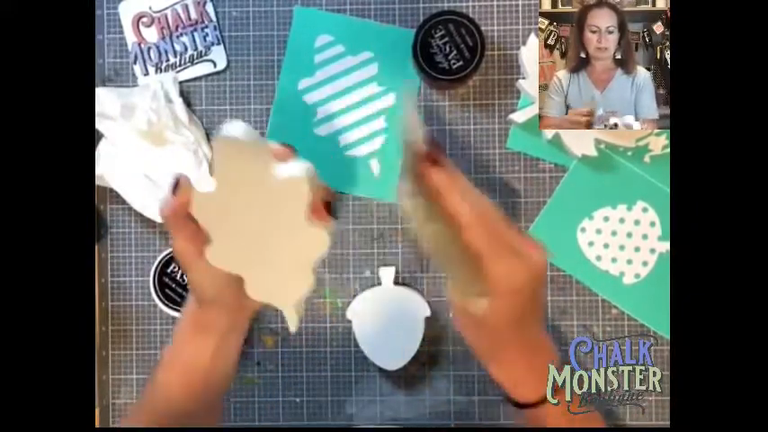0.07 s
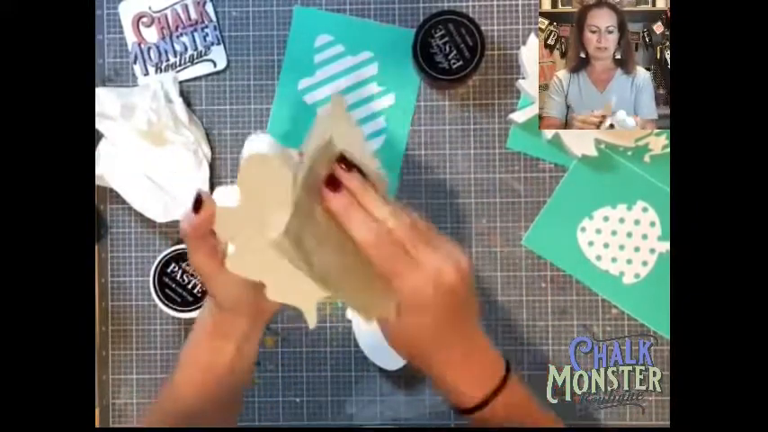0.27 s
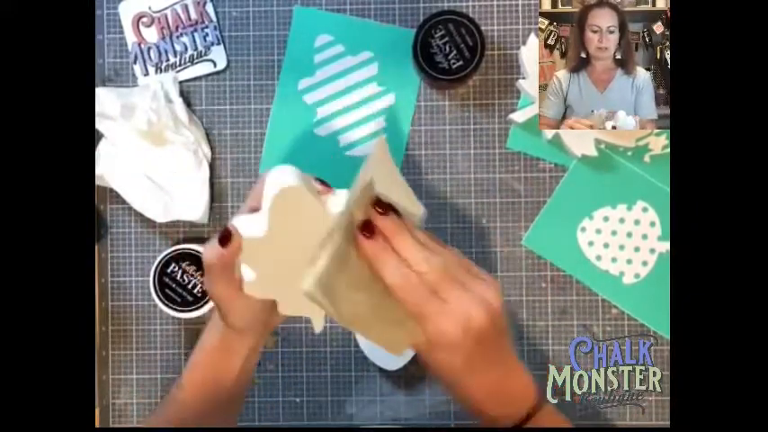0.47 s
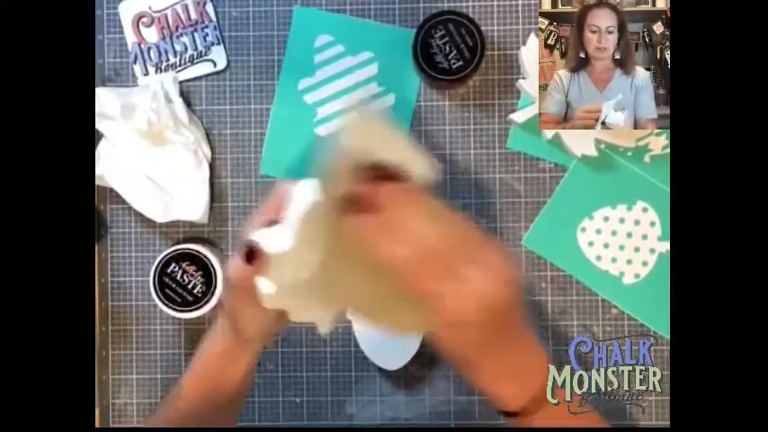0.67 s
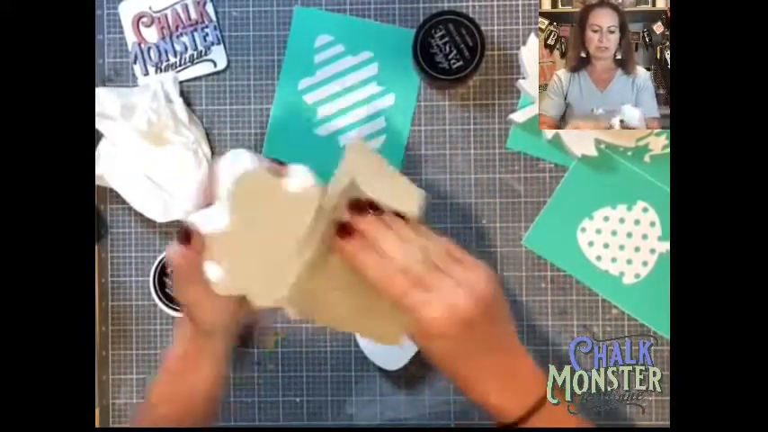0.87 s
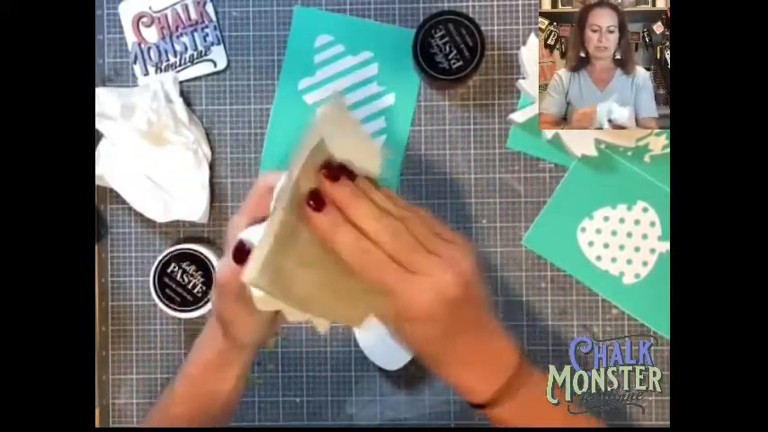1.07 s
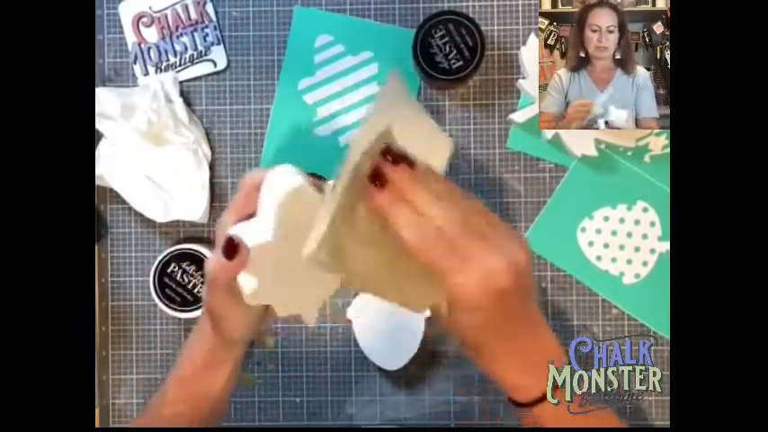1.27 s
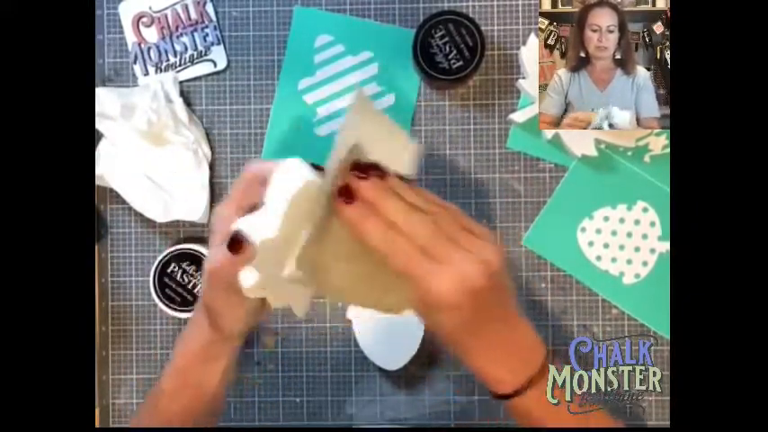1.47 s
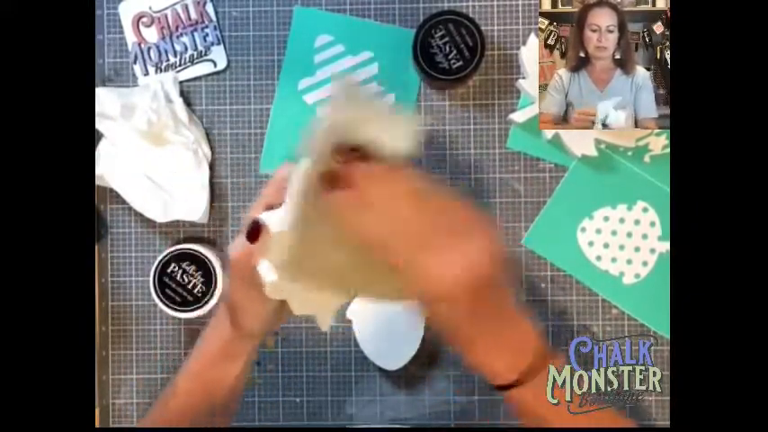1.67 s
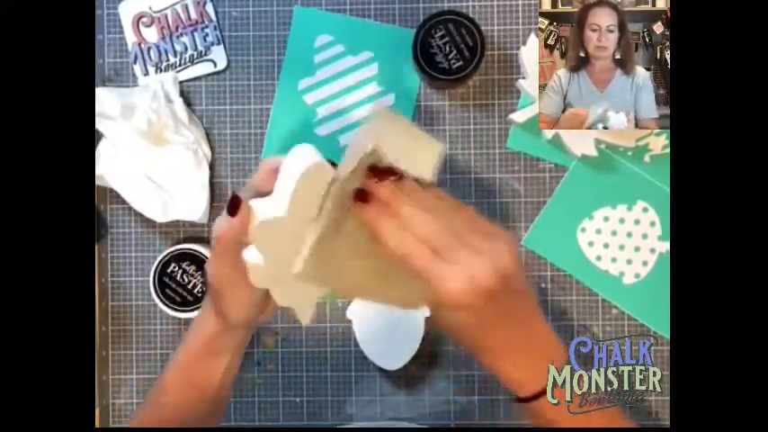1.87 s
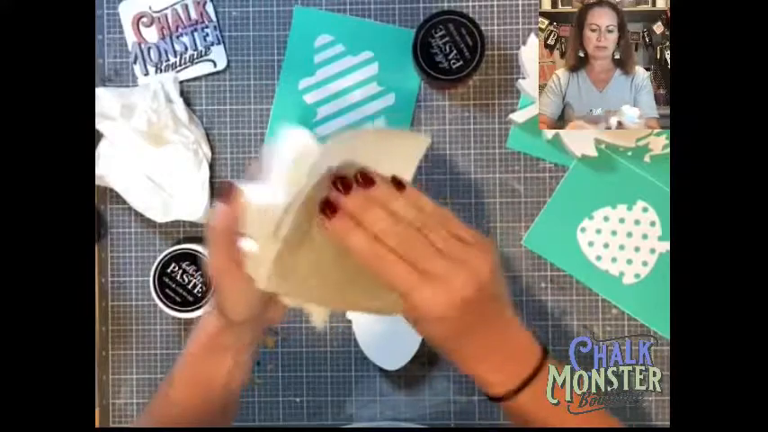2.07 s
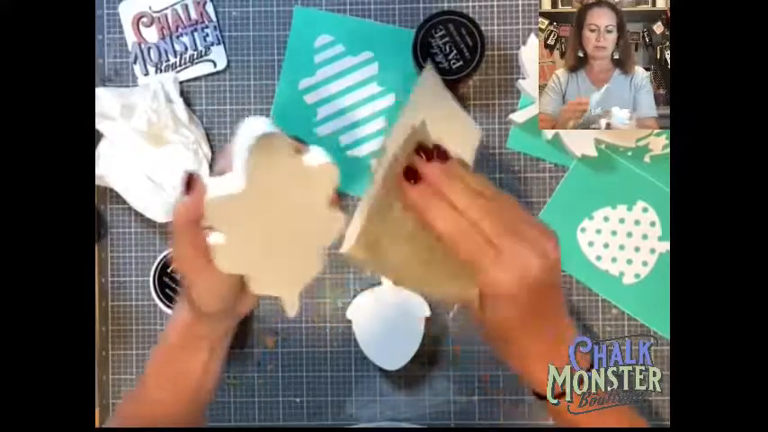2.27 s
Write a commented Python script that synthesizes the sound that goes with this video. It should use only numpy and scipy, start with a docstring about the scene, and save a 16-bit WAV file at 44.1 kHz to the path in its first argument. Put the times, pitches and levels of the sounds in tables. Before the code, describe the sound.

Sandpaper rubs the edge of a small wooden cutout in six quick separate strokes, each a papery tap then a gritty scrape, the third-of-a-second rhythm fairly even, close microphone in a quiet small room.

```python
"""Sandpaper on a wooden edge

Sandpaper is swept in six quick strokes, the first in two passes, along a hand-held wooden cutout in a small room.
Each stroke opens with a papery tap: noise bursts make the slap and the thump. Random grains then scrape the edge
and ring the thin board through resonant filters. Short bursts snag, and narrow noise swells rasp and bend the board.
Echoes of shaped noise make the room; a low hum, faint air and an earlier stroke's fading ring lie under it."""
import sys
import numpy as np
from scipy import signal
from scipy.fft import rfft, irfft
from scipy.io import wavfile

SR = 44100
rng = np.random.default_rng(int(sys.argv[2]) if len(sys.argv) > 2 else 0)


def persist_wave(psi):
    """Save psi, clipped to +-1, as 16-bit WAV."""
    counts = np.round(np.clip(psi, -1, 1) * 32767).astype(np.int16)
    wavfile.write(sys.argv[1], SR, np.atleast_2d(counts).T)


N = 102576  # length in samples

# Scraping passes, one list of points each. Each row: time in seconds, relative level in dB,
# treble in dB (TREBLE_REF_DB is neutral), low mids in dB (LOW_MID_REF_DB is neutral).
PASSES = [
    [(0.39, -66, 1, -11), (0.4, -56.5, -21, 1), (0.415, -57.5, -2.5, -15), (0.435, -52.5, 1.5, 3.5),
     (0.468, -53.5, 1.5, -3), (0.495, -60.5, -6, 7)],
    [(0.522, -62.0, -9.0, -7), (0.54, -43, -18, -10), (0.553, -38.5, -13.5, -8.5), (0.568, -42.0, -16, -4),
     (0.585, -54, -3, 3), (0.605, -62, -21, -3.0)],
    [(0.8, -45.5, -3.5, 7.5), (0.813, -53, 2, -9.0), (0.835, -34, -3, -2.5), (0.848, -37.0, -7, -6),
     (0.866, -28.5, -11, -8.5), (0.885, -32.5, -12, -9), (0.91, -26.5, -7.5, -24), (0.928, -40.5, -4, -4),
     (0.95, -61, -18, -7)],
    [(1.148, -44, -6.5, 2.5), (1.162, -48, -2, -5.5), (1.195, -42, -5.5, -9.0), (1.207, -32.5, -13, -14),
     (1.228, -38.0, -11, -3), (1.243, -50.5, 0, -3), (1.268, -51.5, -2.5, -4), (1.295, -60, -1, 2)],
    [(1.468, -51.0, -3, 8), (1.487, -45.5, 4.5, -13.0), (1.505, -37, -2, -7), (1.521, -32, -4, -11.5),
     (1.535, -46, -21, -17), (1.56, -58, -1, -1), (1.583, -42, -7.5, -12), (1.605, -58, -25, -9.0)],
    [(1.775, -57.5, 3, -7), (1.8, -46.5, 5, -6), (1.818, -47, -6, -5), (1.834, -33.5, -4.5, -11.5),
     (1.865, -44, -6.5, -4.5), (1.885, -49, -9, -4.5), (1.915, -62, -7.0, -24), (1.935, -45, -4, -1),
     (1.955, -67, -7, -20)],
    [(2.066, -47.5, -9, 5), (2.092, -42.5, -3, 0.5), (2.117, -44, -3.5, -1.5), (2.14, -43, 3, -5.5),
     (2.163, -41, -6.5, -12), (2.182, -38.5, -2, -6), (2.222, -39.5, -8.5, -8), (2.242, -44.5, -11, -4),
     (2.262, -56, -10, -5)],
]
# Dull drag of the board, one value per pass: level in dB relative to the scrape.
DRAG_LEVELS = [-8, -39, -24, -19.5, -18, -17, -19]
# The paper lands on the wood. Each row: start in seconds, slap level in dB, thump level in dB,
# treble edge in Hz, treble gain in dB, gain of the thump's bass in dB.
LANDINGS = [(0.271, -41, -49.5, 2280, -13.5, -10), (0.7569, -38, -38.5, 2630, -4.5, -3),
            (1.107, -39, -46, 7550, -1.5, 3), (1.4351, -39.5, -50.5, 6500, -10, 5),
            (1.729, -40.5, -56.5, 7700, -4, 8.5), (2.062, -48, -47.5, 5000, -4, -0.5)]
# The paper snags on the edge. Each row: start in seconds, level in dB, decay time in seconds, treble gain in dB.
SNAG_EVENTS = [(0.9067, -30, 0.0064, -18), (1.2042, -36.5, 0.0026, 2.5), (1.251, -49.5, 0.0012, 5),
               (1.442, -39.5, 0.0014, -24), (1.446, -45, 0.0022, -2), (1.515, -41, 0.0028, -16),
               (1.795, -50, 0.00077, 4), (1.825, -46, 0.0021, -6), (1.935, -52, 0.0013, 4.5),
               (2.109, -39.5, 0.0021, -5)]
# The sliding sheet rasps at a pitch. Each row: middle in seconds, swell width (sigma) in seconds,
# centre in Hz, level in dB.
RASP_SWELLS = [(0.396, 0.0043, 4240, -60.5), (0.445, 0.028, 4220, -57), (0.815, 0.007, 4740, -47.5),
               (0.866, 0.0096, 5170, -42), (1.484, 0.0071, 5400, -43.5), (1.797, 0.011, 5200, -48),
               (2.117, 0.014, 4200, -40)]
# A hard push bends the board, its note set by the grip. Each row: middle in seconds,
# swell width (sigma) in seconds, centre in Hz, level in dB.
FLEX_SWELLS = [(0.565, 0.0046, 645, -48.5), (0.872, 0.026, 1188, -45.5), (1.215, 0.018, 786, -51),
               (1.515, 0.0073, 755, -45.5), (1.842, 0.011, 780, -56.5)]
# Resonances of the board. Each row: centre in Hz, width in Hz, relative level in dB.
BOARD_MODES = [(699, 75, 1.5), (1100, 330, -8.5), (1800, 110, -2.5), (2200, 42, 5.5), (2380, 190, -9),
               (2890, 50, -9.5), (3630, 33, 1.5), (4900, 33, -34), (4660, 290, -7.5)]

# Spectral shapes of the scrape, drag, slap, thump, hum, air and fading stroke.
# Each row: frequency in Hz, relative level in dB.
SCRAPE_COLOUR = [(76, -53), (130, -34.5), (481, -1.5), (601, -15.5), (735, -6.5), (935, -6), (1170, -4.5),
                 (1490, -6.5), (1780, -1.5), (2050, -5), (2320, -1), (4680, -1), (7910, -8), (10300, -8.5),
                 (12100, -15.5), (15100, -11.5), (16000, -20)]
DRAG_COLOUR = [(60, -6), (140, -5.5), (200, -1), (280, -4), (380, 1), (480, 5), (620, -13.5), (2000, -51)]
SLAP_COLOUR = [(200, -39), (620, -10), (900, -12.5), (1150, -8), (1400, -1.5), (1750, 3), (2400, -1),
               (3200, 0.5), (4700, -0.5), (8000, -4.5), (10000, -2.5), (12500, -14.5), (15500, -9)]
THUMP_COLOUR = [(40, -9), (100, -16.5), (170, -3), (250, 4), (370, -2), (490, 2), (620, -11), (900, -8.5),
                (1200, -9.5), (1600, -16.5), (6000, -46)]
HUM_COLOUR = [(20, -28), (32, -5), (42, -7.5), (51, 8.5), (68, -11.5), (88, 12), (100, -5), (120, -28),
              (200, -6)]
AIR_COLOUR = [(100, 22.5), (200, 9.5), (500, 2), (800, 7.5), (1900, 6.5), (3000, -1.5), (6000, -21),
              (10000, -21), (16000, -26)]
LINGER_COLOUR = [(300, -10), (900, 1), (1900, 4.5), (4000, -3.5), (6500, -10.5), (10000, -24), (16000, -36)]
# Reverberation of the room. Each row: frequency in Hz, time to fall 60 dB in seconds.
ROOM_DECAY = [(150, 0.86), (600, 0.45), (2000, .45), (5000, 0.44), (10000, 0.31), (16000, 0.17)]

GRAINS_PER_S, GRAIN_SPREAD_DB, JUDDER_HZ, JUDDER_DB = 11000, 2.5, 198.2, 1.25
SCRAPE_DB, LIFT_S = -1.5, 0.002  # overall trim; fade at either end of a pass
LOW_CUT_HZ, LOW_MID_HZ, UPPER_MID_HZ, TREBLE_HZ = 463, 1850, 3600, 5700  # band edges of the scrape
TREBLE_REF_DB, LOW_MID_REF_DB = -6.5, -7.5
UPPER_MID_SHARE = 0.25  # the upper mids follow this share of the treble's swing
SHIMMER_HZ, SHIMMER_DB = 44.83, 1.47  # the flexing sheet keeps changing colour
BOARD_DB = -3
SLAP_S, SETTLE_S, THUMP_S = 0.0013, 0.022, 0.006  # decays: first contact, settling sheet, board's push
SETTLE_DB, SETTLE_HZ, THUMP_BASS_HZ = 0, 8600, 307
BURST_S = 0.01  # a burst at level 1 has the energy of this much noise of rms 1
RASP_WIDTH_HZ, FLEX_WIDTH_HZ = 680, 82
ROOM_DB, ROOM_GAP_S = -12, 0.005
WALLS_DB, WALLS_GAP_S, WALLS_S = -7.5, 0.006, 0.016  # close reflections: level, first delay, decay
HUM_DB, AIR_DB = -59.5, -61
LINGER_DB, LINGER_S = -55, 0.11  # an earlier stroke still dying away in the room
TOP_HZ = 16000


def scraping():
    """Grit catches and lets go thousands of times a second; the hand judders, and its grip shifts the colour."""
    t = np.arange(N) / SR
    catches = rng.random(N) < GRAINS_PER_S / SR
    sizes_db = GRAIN_SPREAD_DB * np.minimum(rng.exponential(size=N), 4)
    sizes = undb(sizes_db) * rng.choice([-1, 1], N)
    force = catches * sizes * undb(JUDDER_DB * wander(JUDDER_HZ))
    grit = unit(shimmer(board(colour(force, SCRAPE_COLOUR))))
    drag = unit(colour(force, DRAG_COLOUR))

    # Subtracting neighbouring low-passes splits the grit into bands.
    edges = (LOW_CUT_HZ, LOW_MID_HZ, UPPER_MID_HZ, TREBLE_HZ)
    layers = [below(grit, hz) for hz in edges] + [grit]
    low, middle, upper, high = np.diff(layers, axis=0)  # everything under LOW_CUT_HZ is dropped

    out = np.zeros(N)
    for points, drag_db in zip(PASSES, DRAG_LEVELS):
        when, level_db, treble_db, low_mid_db = np.array(points).T

        def gain(curve_db):
            """Draw a smooth gain through the points of this pass."""
            return undb(np.interp(t, when, curve_db))

        outside = np.maximum(np.maximum(when[0] - t, t - when[-1]), 0)
        contact = np.exp(-outside / LIFT_S)
        bright_db = treble_db - TREBLE_REF_DB
        hiss = middle + gain(UPPER_MID_SHARE * bright_db) * upper + gain(bright_db) * high
        body = gain(low_mid_db - LOW_MID_REF_DB) * low + undb(drag_db) * drag
        out += contact * gain(level_db) * (hiss + body)
    return undb(SCRAPE_DB) * out


def shimmer(x):
    """Half-octave bands rise and fall a little on their own as the sheet flexes."""
    out = 0
    for hz in np.geomspace(700, 11200, 9):
        band = below(x, hz, order=6)
        x = x - band
        out = out + band * undb(SHIMMER_DB * wander(SHIMMER_HZ))
    return out + x


def board(x):
    """The thin wood adds its short resonances to whatever excites it."""
    ring = sum(undb(db) * resonate(x, hz, width) for hz, width, db in BOARD_MODES)
    return (x + undb(BOARD_DB) * ring) / np.sqrt(1 + undb(BOARD_DB))


def taps():
    """The sheet slaps the edge and settles; the fingers behind it thump the board."""
    slaps, thumps = np.zeros(N), np.zeros(N)
    for start, slap_db, thump_db, edge_hz, treble_db, bass_db in LANDINGS:
        settling = below(burst(start, SETTLE_S), SETTLE_HZ, order=1)
        hit = burst(start, SLAP_S) + undb(SETTLE_DB) * settling
        slaps += undb(slap_db) * tilt(hit, edge_hz, treble_db)
        push = burst(start, THUMP_S)
        bass = below(push, THUMP_BASS_HZ)
        thumps += undb(thump_db) * (push + (undb(bass_db) - 1) * bass)
    return board(colour(slaps, SLAP_COLOUR)) + colour(thumps, THUMP_COLOUR)


def snags():
    """Coarse grains catch on the edge and tear free."""
    out = np.zeros(N)
    for start, db, decay, treble_db in SNAG_EVENTS:
        tear = burst(start, decay)
        out += undb(db) * tilt(tear, TREBLE_HZ, treble_db)
    return board(colour(out, SCRAPE_COLOUR))


def rubbed(rows, width):
    """Friction, as noise, drives one resonance in a short swell for each row."""
    t, out = np.arange(N) / SR, np.zeros(N)
    for middle, sigma, hz, db in rows:
        friction = rng.standard_normal(N)
        ring = unit(resonate(resonate(friction, hz, width), hz, 2 * width))
        swell = np.exp(-.5 * ((t - middle) / sigma) ** 2)
        out += undb(db) * ring * swell
    return out


def room(x):
    """Close reflections off the table and walls come back with a short diffuse tail."""
    t = np.arange(SR // 2) / SR
    sparse = rng.standard_normal(len(t)) * (rng.random(len(t)) < .05)
    near = sparse * (t > WALLS_GAP_S) * np.exp(-t / WALLS_S)
    near = below(near, 13500, order=1)
    noise, tail = rng.standard_normal(len(t)), 0
    for hz in np.geomspace(250, 16000, 7):  # octave bands, each with its own decay
        band = below(noise, hz * np.sqrt(2))
        noise = noise - band
        decay = np.exp(-np.log(1000) * t / along(ROOM_DECAY, hz))
        tail = tail + band * (t > ROOM_GAP_S) * decay
    walls = undb(WALLS_DB) * near / np.linalg.norm(near)
    diffuse = undb(ROOM_DB) * tail / np.linalg.norm(tail)
    return x + signal.fftconvolve(x, walls + diffuse)[:N]


def background():
    """Low hum and faint air of the room are shaped noise, with the fading ring of an earlier stroke."""
    hum = unit(below(colour(rng.standard_normal(N), HUM_COLOUR), 138))
    air = colour(rng.standard_normal(N), AIR_COLOUR)
    fade = np.exp(-np.arange(N) / SR / LINGER_S)
    linger = colour(rng.standard_normal(N), LINGER_COLOUR) * fade
    return undb(HUM_DB) * hum + undb(AIR_DB) * air + undb(LINGER_DB) * linger


def burst(start, decay):
    """A cluster of tiny impacts dies away, its energy set by BURST_S whatever its decay."""
    age = np.arange(N) / SR - start
    x = rng.standard_normal(N) * (age >= 0) * np.exp(-np.abs(age) / decay)
    return x * np.sqrt(BURST_S * SR) / np.linalg.norm(x)


def resonate(x, hz, width):
    """One resonance, gain 1 at its centre."""
    return signal.lfilter(*signal.iirpeak(hz, hz / width, fs=SR), x)


def colour(x, points, size=4096):
    """Causal (minimum-phase) filter of unit energy with the given (Hz, dB) shape."""
    shape = undb(along(points, np.fft.rfftfreq(size, 1 / SR)))
    cepstrum = irfft(np.log(shape))
    cepstrum[1:size // 2] *= 2  # folding the cepstrum puts the energy at the onset
    cepstrum[size // 2 + 1:] = 0
    h = irfft(np.exp(rfft(cepstrum)))
    return signal.fftconvolve(x, h / np.linalg.norm(h))[:len(x)]


def tilt(x, edge_hz, treble_db):
    """Set the gain of the treble above an edge."""
    dull = below(x, edge_hz)
    return dull + undb(treble_db) * (x - dull)


def below(x, hz, order=3):
    """Low-pass without delay."""
    sos = signal.butter(order, min(hz, SR * .45), fs=SR, output="sos")
    return signal.sosfiltfilt(sos, x)


def wander(rate):
    """Random motion with rms 1, drawn through `rate` random points a second."""
    return unit(np.interp(np.arange(N) / SR * rate, np.arange(N), rng.standard_normal(N)))


def along(points, hz):
    """Read (Hz, value) points on a log-frequency axis."""
    f, v = np.array(points, float).T
    return np.interp(np.log(hz + 1e-9), np.log(f), v)


def unit(x):
    """Scale to rms 1."""
    return x / np.sqrt(np.mean(x ** 2))


def undb(db):
    """Turn decibels into an amplitude factor."""
    return 10 ** (np.asarray(db) / 20)


def scene():
    """Sanding is heard in the room, over the background."""
    sanding = scraping() + taps() + snags()
    sanding += rubbed(RASP_SWELLS, RASP_WIDTH_HZ) + rubbed(FLEX_SWELLS, FLEX_WIDTH_HZ)
    return (room(sanding) + background())[None]


def record(dry):
    """The microphone cuts the very top."""
    return signal.sosfilt(signal.ellip(10, .2, 70, TOP_HZ, fs=SR, output="sos"), dry)


dry = scene()
out = record(dry)
persist_wave(out)
```